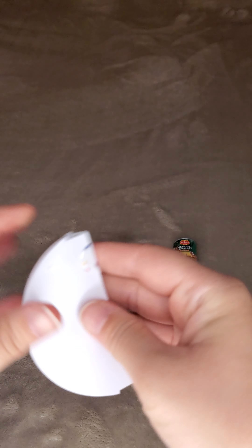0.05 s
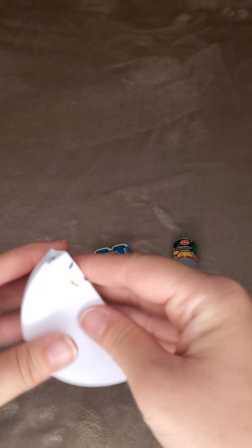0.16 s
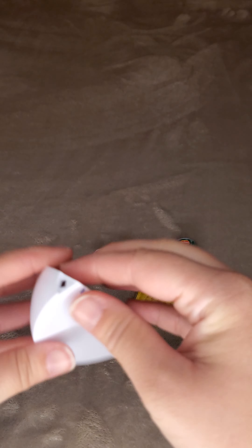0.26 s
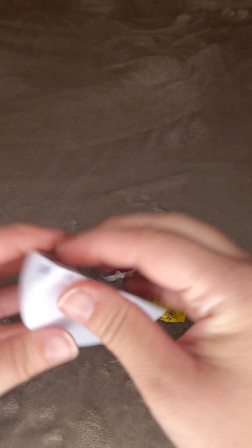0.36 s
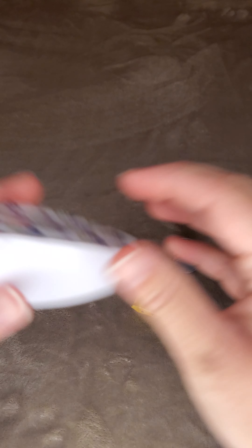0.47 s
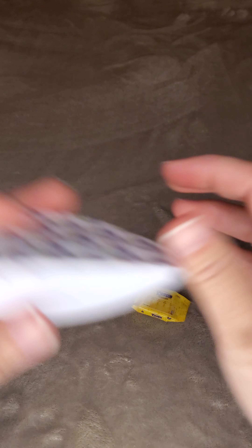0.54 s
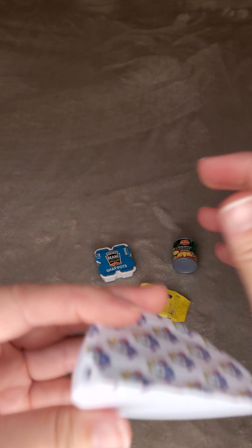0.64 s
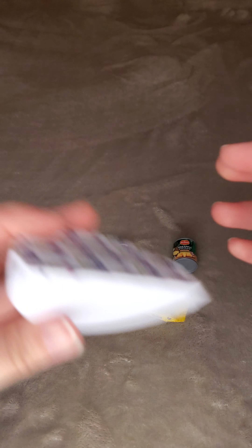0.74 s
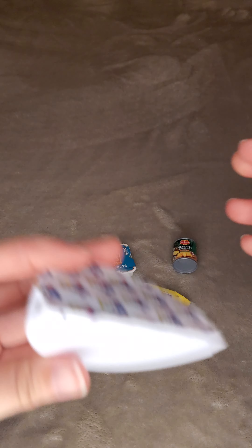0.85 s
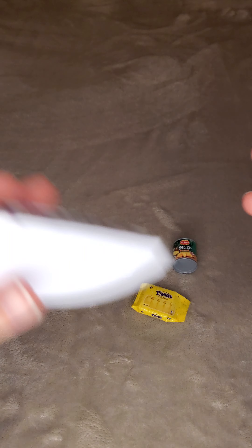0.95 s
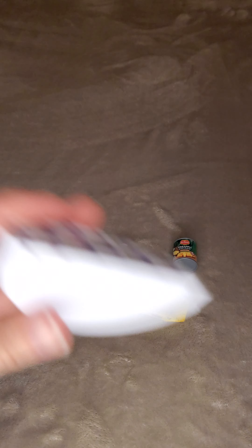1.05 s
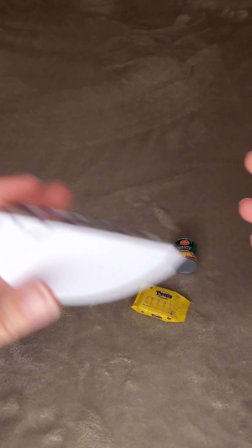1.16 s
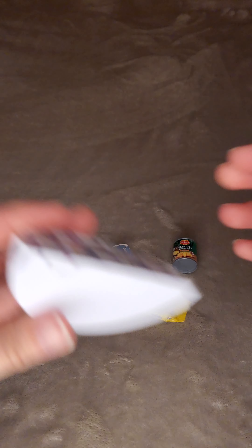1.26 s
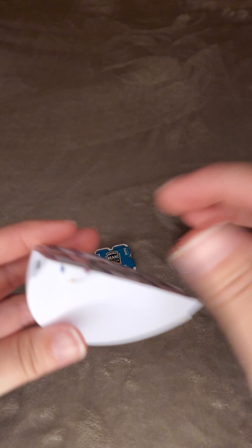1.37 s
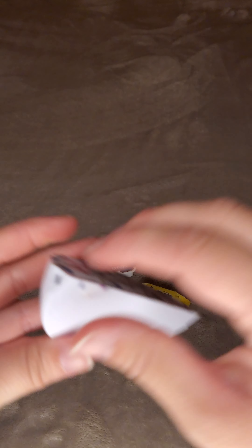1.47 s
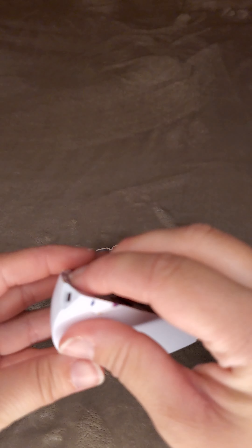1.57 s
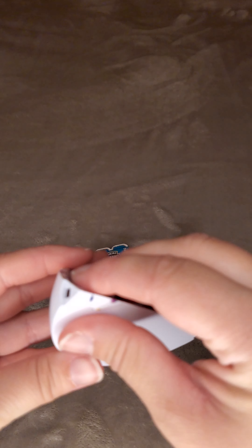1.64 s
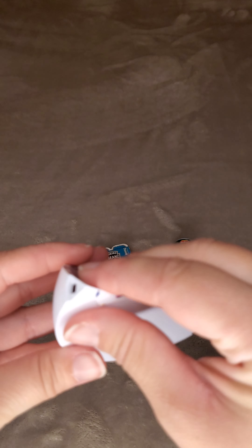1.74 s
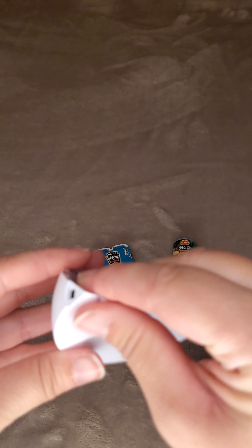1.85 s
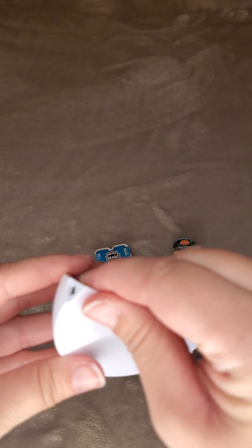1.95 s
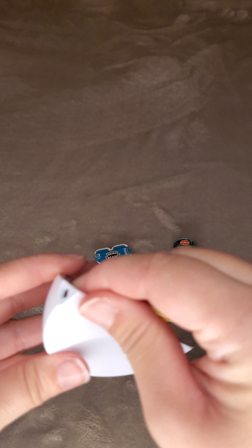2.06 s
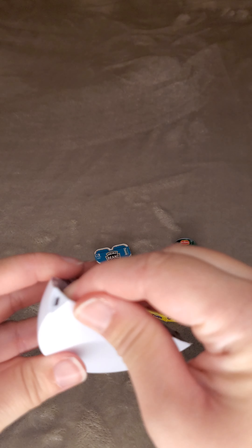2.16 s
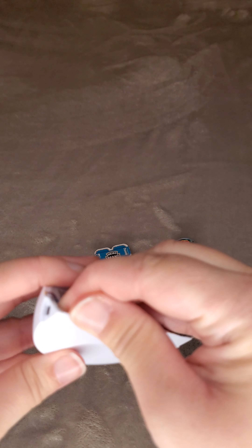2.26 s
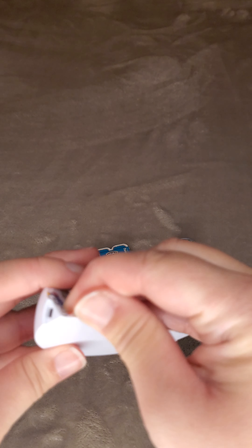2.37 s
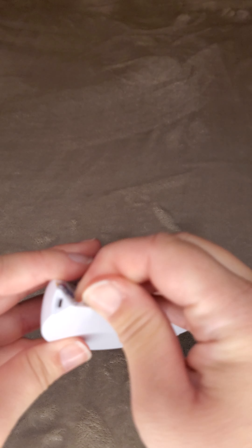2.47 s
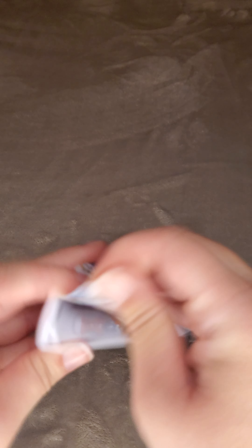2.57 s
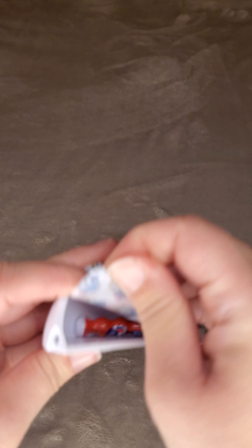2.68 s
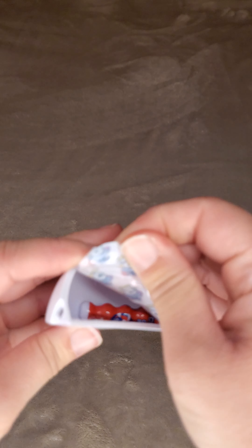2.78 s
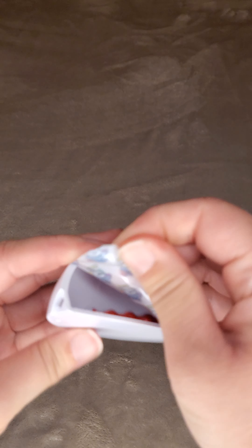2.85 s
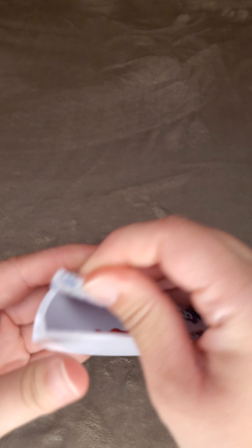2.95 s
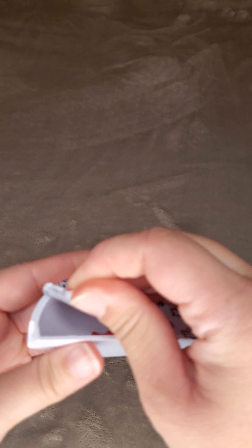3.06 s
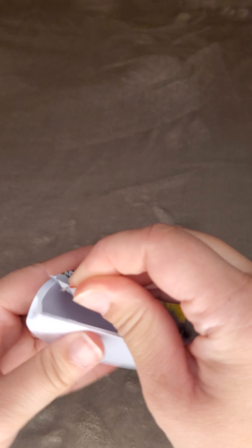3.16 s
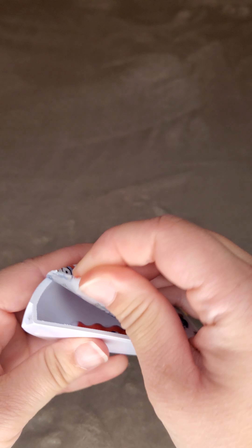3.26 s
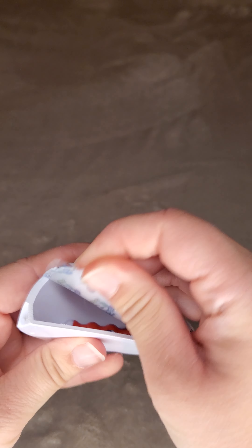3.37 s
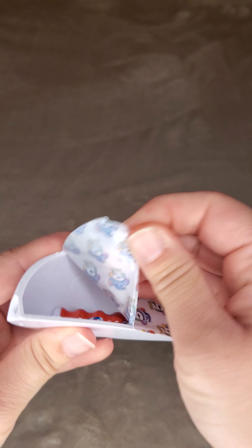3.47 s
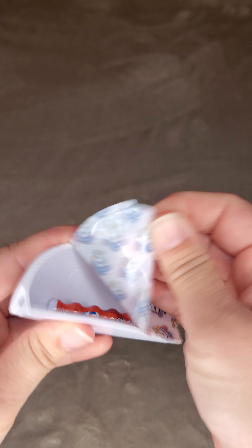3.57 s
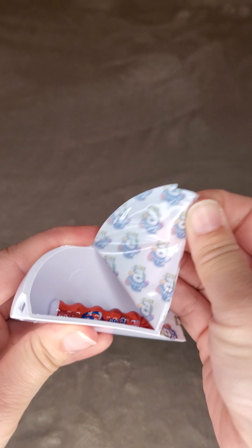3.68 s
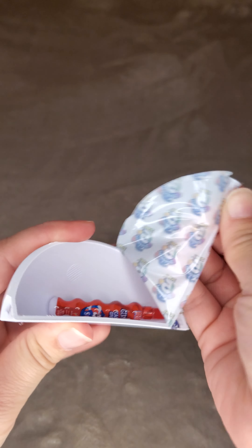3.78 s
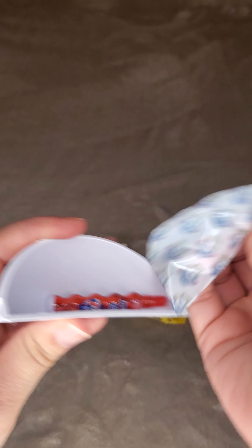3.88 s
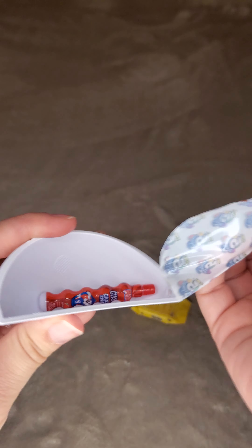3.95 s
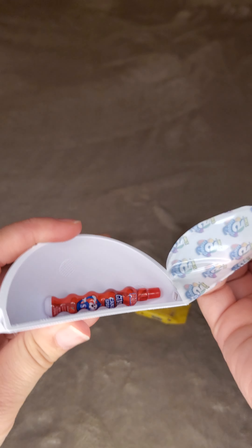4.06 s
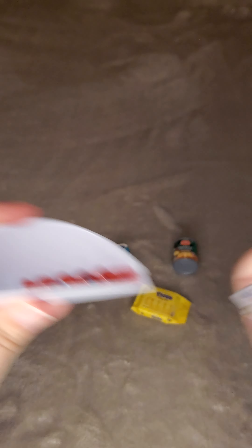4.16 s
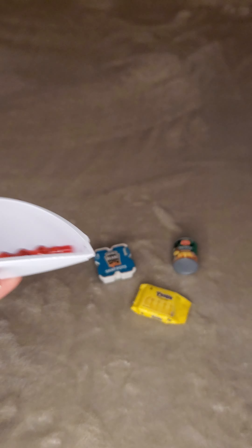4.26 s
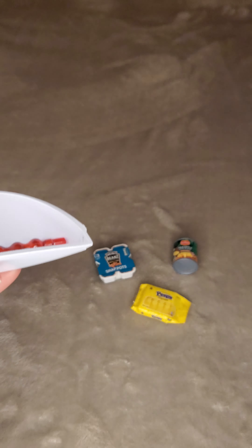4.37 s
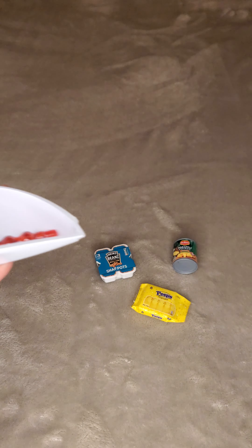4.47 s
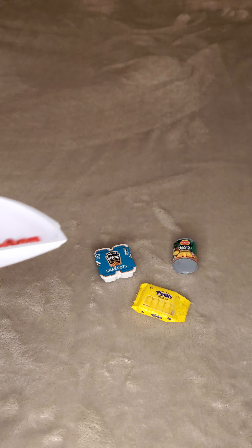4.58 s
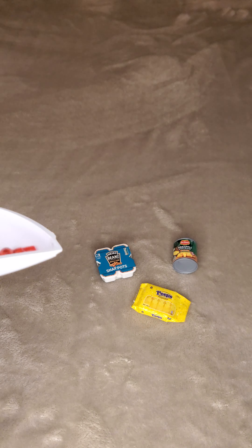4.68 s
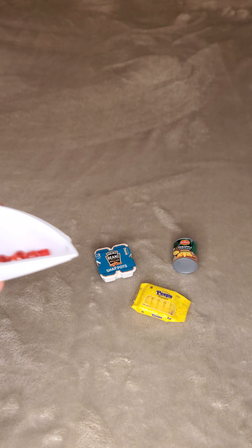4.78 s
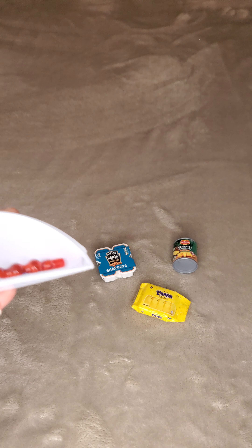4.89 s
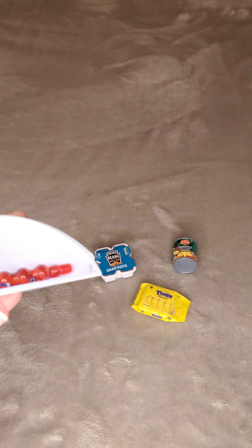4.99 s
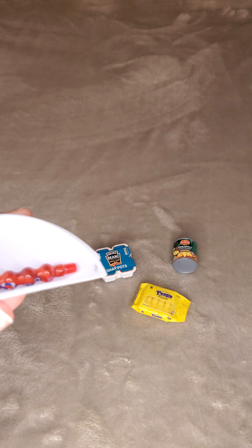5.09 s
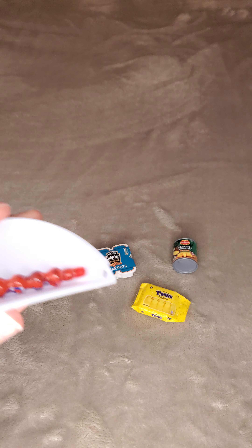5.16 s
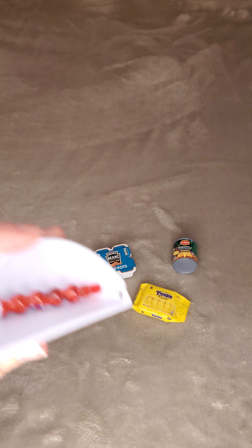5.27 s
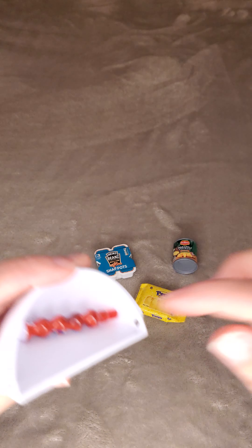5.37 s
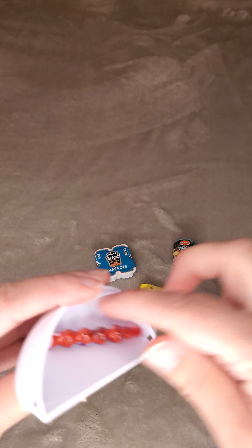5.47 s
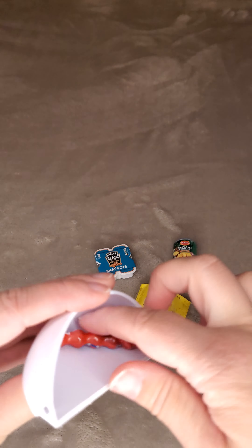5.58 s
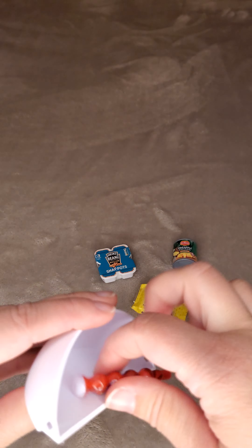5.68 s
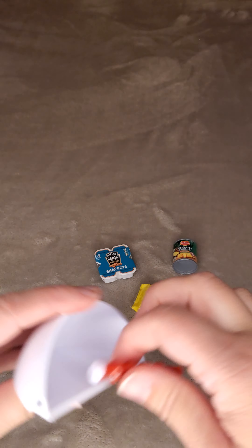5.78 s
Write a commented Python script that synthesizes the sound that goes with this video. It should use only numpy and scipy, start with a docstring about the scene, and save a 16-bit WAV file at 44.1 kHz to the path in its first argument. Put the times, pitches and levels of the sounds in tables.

```python
"""Peeling a small plastic shell

Close on a two-port microphone, hands shake a thin hollow plastic wedge with a toy inside, then peel off its film lid.
Each knock or snap is a ragged push that rings wall, air hollow, film and flexing shell.
Rubbing and tearing drive the same modes with dense grains; pulled film and shell drum low.
Air thuds on the ports, film and sleeve rustle away over a blanket, the room answers briefly above a quiet hiss."""
import sys
import numpy as np
from scipy import signal
from scipy.fft import rfft, irfft
from scipy.io import wavfile
from scipy.ndimage import uniform_filter1d

SR = 44100
rng = np.random.default_rng(int(sys.argv[2]) if len(sys.argv) > 2 else 0)


def master_out(mix):
    """Clip the mix to full scale and print it as 16-bit PCM to the path in sys.argv[1]."""
    frames = np.transpose(np.atleast_2d(mix))
    ceiling = np.clip(frames, -1, 1)
    pcm = np.round(ceiling * 32767).astype(np.int16)
    wavfile.write(sys.argv[1], SR, pcm)


N = 257099
OPEN_FROM_S = 5.45   # from here on the shell is lidless

# knocks and snaps: [t/s, wall level/dB, hollow level/dB, film level/dB, strongest wall ring f/Hz, contact/ms]
SNAPS = [(.097, -39.5, -34.5, -42.5, 3142, 2.8), (.207, -61.5, -52, -80, 2130, 1.5),
         (.277, -69, -55.5, -66, 2110, 2), (.318, -52, -48, -47, 3753, 4.6),
         (.4, -73, -51, -69, 1970, 0.87), (.419, -76, -54, -74, 1944, 1.7),
         (.56, -42, -37.5, -54, 3406, 0.79), (.587, -45, -38, -61, 3325, 0.55),
         (.645, -17.5, -22, -23, 3303, 0.46), (.655, -28, -25.5, -48.5, 3530, 0.32),
         (.699, -10, -25.5, -26, 3442, 0.9), (.716, -29.5, -36, -54, 3726, 0.94),
         (.724, -13.5, -10, -15.5, 3880, 1.73), (.742, -15.5, -22, -42, 3900, 1.44),
         (.767, -14, -18.5, -14, 3560, 3.02), (.954, -33.5, -28.5, -62.5, 3048, 0.77),
         (.963, -19, -30, -17.5, 3684, 0.63), (.977, -23.5, -35, -27, 4410, 2.6),
         (.983, -19, -29, -17.5, 4443, 0.94), (.989, -18.5, -30, -32.5, 3720, 0.55),
         (1.045, -34.5, -37, -41, 3573, 0.53), (1.14, -14, -27, -18.5, 3502, 1.12),
         (1.17, -26, -47, -59, 3466, 3.6), (1.176, -26, -21, -24.5, 4395, 3),
         (1.213, -28.5, -23, -24.5, 3380, 2.7), (1.392, -47, -34.5, -75, 1952, 0.35),
         (1.406, -19.5, -25, -19, 3818, 0.93), (1.432, -19.5, -24.5, -21.5, 4527, 2.4),
         (1.445, -15, -21, -20, 3650, 1.06), (1.467, -31.5, -28.5, -40.5, 2290, 0.48),
         (1.61, -23.5, -30.5, -26, 2482, 0.14), (1.621, -38, -63.5, -42.5, 2450, 1.86),
         (1.631, -32.5, -33, -35.5, 4540, 1.2), (1.647, -42.5, -45, -64.5, 2610, 3.6),
         (1.687, -58, -50.5, -76, 2910, 2.2), (1.881, -53, -51.5, -36, 2060, 1.14),
         (1.895, -75, -47.5, -65, 1900, 1.08), (1.979, -72, -64, -51.5, 4370, .5),
         (2.007, -65, -53, -49, 1950, 0.91), (2.035, -47.5, -39.5, -47, 2871, 1.27),
         (2.083, -51.5, -45, -50, 3060, 2.5), (2.109, -70, -31.5, -89, 2519, 1.03),
         (2.131, -61.5, -46.5, -82, 3005, 0.78), (2.203, -41.5, -51.5, -36, 4370, 0.49),
         (2.245, -56, -62, -43, 4940, .8), (2.25, -39, -48.5, -27.5, 4890, 2.04),
         (2.291, -55.5, -53, -49.5, 5120, 1.6), (2.363, -51.5, -65, -46.5, 5273, 4.7),
         (2.385, -50, -70, -47, 5050, 0.39), (2.407, -54, -53, -53, 4500, 1.5),
         (2.412, -36, -24.5, -64, 1843, 1.47), (2.467, -47.5, -58, -42, 5130, 0.37),
         (2.497, -55, -54, -53, 2877, 0.57), (2.528, -48, -66, -36.5, 4900, 0.097),
         (2.645, -37, -65, -33, 5150, 0.5), (2.661, -17, -29, -14.5, 3198, 4),
         (2.693, -32.5, -63.5, -59, 2642, 0.38), (2.706, -28, -22, -28, 1970, 0.9),
         (2.716, -27, -26, -31, 2304, 4.9), (2.723, -33.5, -43, -51.5, 1955, 1.4),
         (2.737, -28, -27.5, -30.5, 3840, 2), (2.767, -34, -23, -42, 2462, 2.2),
         (2.882, -42, -33.5, -44, 3350, 1.25), (2.93, -34, -33, -36, 2578, 1.6),
         (2.944, -43.5, -41, -71, 2550, 0.44), (2.971, -37, -48, -54, 1770, 1.7),
         (3.007, -39, -44, -41, 2529, 0.32), (3.041, -40.5, -42, -54, 1917, 0.16),
         (3.106, -29.5, -45, -43, 3018, 0.09), (3.188, -74, -49, -78, 2130, 0.8),
         (3.207, -35, -40, -60, 3530, 2), (3.216, -35, -36.5, -50, 3460, 0.77),
         (3.221, -43, -32.5, -60, 3666, 2.45), (3.226, -26.5, -35, -37.5, 3487, 2.5),
         (3.246, -37, -41, -57, 3610, 0.54), (3.307, -31, -35, -39, 2562, 0.2),
         (3.322, -44.5, -37, -44, 3540, 2.6), (3.396, -50, -46.5, -52.5, 2210, 0.34),
         (3.414, -43.5, -44, -50.5, 2190, 0.44), (3.437, -16.5, -21, -22.5, 2462, 2.66),
         (3.459, -34, -34, -26.5, 2410, 0.45), (3.478, -31.5, -28.5, -33, 2206, 4.1),
         (3.492, -30.5, -36, -19.5, 2400, 0.11), (3.5, -27.5, -30, -31, 2237, 0.42),
         (3.539, -26, -29.5, -23.5, 2097, 1.86), (3.55, -40.5, -51, -33.5, 2253, 0.86),
         (3.589, -18.5, -25.5, -20, 3577, 0.51), (3.642, -29, -66, -52, 2288, 2.5),
         (3.657, -21, -45, -20.5, 1870, 2), (3.717, -26.5, -33, -25, 2300, 0.42),
         (3.739, -38, -39, -37, 3500, 0.6), (3.771, -36, -42, -59.5, 2228, 1.2),
         (3.781, -22.5, -25.5, -17.5, 2160, 0.93), (3.787, -21, -44, -35, 2274, 0.85),
         (3.799, -17.5, -18.5, -19, 4027, 0.51), (3.824, -19, -28, -14.5, 3800, 0.29),
         (3.835, -30, -25.5, -24.5, 2100, 0.53), (3.888, -28.5, -38, -28, 4094, 1.7),
         (3.895, -21, -42, -20, 4150, 1.34), (3.931, -18, -46, -23.5, 3437, 0.28),
         (3.957, -23, -33, -26.5, 2292, 0.35), (4.032, -24, -26.5, -19, 4446, 4.8),
         (4.052, -31.5, -39, -31.5, 3820, 2.1), (4.118, -31, -40, -30, 3366, 0.42),
         (4.167, -25.5, -29, -19.5, 2655, 0.8), (4.181, -27.5, -28.5, -51, 2813, 0.22),
         (4.186, -34, -28.5, -22, 3500, 0.49), (4.192, -28.5, -37, -19, 2322, 0.47),
         (4.207, -32, -28.5, -21.5, 2330, 4.6), (4.235, -26, -39.5, -26, 2990, 1.4),
         (4.272, -32, -53, -54, 2326, 0.66), (4.279, -22, -38, -26, 2250, 1.93),
         (4.29, -34.5, -51, -43, 2378, 5.9), (4.332, -37.5, -55, -49, 2430, 0.89),
         (4.399, -54, -82, -46, 4303, 0.18), (4.471, -53.5, -89, -47, 3450, 0.3),
         (4.511, -45, -84, -37.5, 4755, 4.4), (4.956, -62.5, -71, -43, 4890, 1),
         (5.573, -43, -54.5, -69, 2246, 1.67), (5.597, -44, -56, -55, 2850, 1.5),
         (5.614, -35, -42, -50, 3844, 2.8), (5.686, -48, -74, -66, 4077, 2.3),
         (5.706, -28.5, -52, -51, 3180, 0.57), (5.718, -30, -48, -44, 3100, 3.7),
         (5.744, -45, -38, -56, 2234, 0.23), (5.755, -29.5, -49, -44.5, 2018, 0.97),
         (5.765, -33.5, -52, -49, 2030, 1.6)]
# shell wall modes: [f/Hz, relative level/dB, t60/s]
WALL = [(1910, -11.5, 0.0066), (2210, -10.5, 0.012), (2716, -4, 0.0089), (3176, -4, 0.0066),
        (3820, 1.5, 0.0024), (4330, -14, 0.013), (5290, -15.5, 0.0099)]
# film and rim modes: [f/Hz, relative level/dB, t60/s]
FILM = [(5780, 4.5, 0.0021), (6710, -5.5, 0.0077), (7445, 0, 0.0059), (8110, 0.5, 0.0071),
        (8550, -5.5, 0.0055), (10420, -7.5, 0.0022), (12600, -8, 0.0015), (15000, -9.5, 0.0022)]
# flexing of the whole shell, the last mode sounding along with the hollow: [f/Hz, relative level/dB, t60/s]
FLEX = [(217, -23.5, 0.027), (314, -31, 0.065), (390, -17, 0.031), (675, -28, 0.0032), (1021, -7.5, 0.0097)]
# the air hollow as hands and lid cover it: [t/s, pitch f/Hz, t60/s]
HOLLOW = [(0, 1394, 0.027), (.72, 1309, 0.016), (1.699, 1434, 0.025), (1.9, 1210, 0.013),
          (2.04, 1397, 0.027), (2.11, 1224, 0.029), (2.42, 1270, 0.021), (2.7, 1414, 0.034),
          (2.88, 1433, 0.024), (2.93, 1249, 0.0081), (3.19, 1344, 0.011), (3.22, 1483, 0.04),
          (3.3, 1448, 0.018), (3.44, 1256, 0.023), (3.6, 1569, 0.014), (3.799, 1276, 0.0017),
          (4.3, 1413, 0.01), (5.6, 1758, 0.0065)]
# share of sound that differs in the right port: [wall, hollow, film, flexing]
UNLIKE = (0.9, 0.57, 0.99, 0.94)


def snaps():
    """Each contact is a short ragged push; every mode answers with a strength of its own."""
    hollow_spread = 0.052   # share by which each knock strays from the hollow's pitch
    # small after-clicks of wall and film that trail each snap
    crackle_db, crackle_per_s, crackle_decay_s = -17, 300, .008
    size = 2000   # samples per snap
    out, t = np.zeros((2, N + size)), np.arange(size) / SR
    rough = rng.standard_normal((len(SNAPS), 2, size))
    luck_db = 4.5 * rng.standard_normal((len(SNAPS), 2, 4, 10))
    after = rng.random((len(SNAPS), size)) < crackle_per_s / SR
    topmost = np.arange(10) >= 5   # upper film modes
    knots, pitch_hz, rings_s = np.transpose(HOLLOW)
    stray = np.exp(hollow_spread * rng.standard_normal(len(SNAPS)))
    hollows_hz = np.interp(np.array(SNAPS)[:, 0], knots, pitch_hz) * stray
    for k, (s, wall_db, hollow_db, film_db, ring_hz, contact_ms) in enumerate(SNAPS):
        # the push swells, then ends quickly
        envelope = t * np.exp(-(1000 * t / np.clip(contact_ms, .1, 15)) ** 2)
        push = rough[k] * np.abs(rough[k]) ** .5 * envelope
        clicks = amp(crackle_db) * rough[k, :, ::-1] * after[k] * np.exp(-t / crackle_decay_s)
        crackling = push / np.abs(push).max() + clicks
        # air and the whole shell feel no sharp edges
        dull = signal.lfilter([1], [1, -.7], push)
        # a snap of the film alone is crisper than a knock on the wall
        crisp_db = 1.5 * np.clip(film_db - wall_db, -12, 12) * topmost
        wall = WALL + [(ring_hz, 3, .011)]
        hollow = FLEX[-1:] + [(hollows_hz[k], 3.0, np.interp(s, knots, rings_s))]
        # part: push, modes, level/dB, tilt/dB
        parts = [(crackling, wall, wall_db, 0), (dull, hollow, hollow_db, 0),
                 (crackling, FILM, film_db, crisp_db), (dull, FLEX[:-1], hollow_db - 27.5, 0)]
        at = round(s * SR)
        for p, (drive, modes, db, tilt_db) in enumerate(parts):
            both = np.array([body(drive[side], modes, luck_db[k, side, p] + tilt_db) for side in (0, 1)])
            # rms of the loudest 2 ms
            loudest = np.sqrt(uniform_filter1d(both ** 2, size=88).max(axis=1))
            out[:, at:at + size] += amp(db) * pair(*(both / loudest[:, None]), UNLIKE[p])
    return out[:, :N]


def rubbing():
    """Skin and tearing glue: smooth friction plus clumps of tiny uneven slips, through the shell's modes."""
    # the lidless shell under a scraping finger: [f/Hz, relative level/dB, t60/s]
    open_shell = [(1950, -12, .014), (2260, -6, .045), (2950, -9, .018), (3950, -9, .025), (5800, -9, .028)]
    peel_from_s, tear_from_s = 1.8, 3.4
    # harder rubbing than this film level turns gritty and bright; lighter skin contact is smooth and dull
    bite_from_db, skin_cut_hz = -52.5, 9400
    gains, t = pressure(), np.arange(N) / SR
    bite = np.clip((20 * np.log10(gains[2]) - bite_from_db) / 12, 0, 1)
    tearing = (t > tear_from_s) & (t < OPEN_FROM_S)

    # slowly torn glue lets go in separate ticks
    dense = np.where(tearing, np.maximum(bite, .07), 1)
    slip_per_s = 2600 * dense * amp(5.0 * drift(50))
    slips = (rng.random((2, N)) < slip_per_s / SR) / np.sqrt(dense)
    uneven = amp(4.55 * np.minimum(rng.exponential(1, (2, N)), 5))
    slips = slips * uneven * rng.choice([-1, 1], (2, N))
    smooth = rng.standard_normal((2, N)) * amp(3 * drift(90))
    grit = np.where(tearing, .9, .65 + .3 * bite)   # share of slips in the friction
    sharp = grit * rms_one(slips) + np.sqrt(1 - grit ** 2) * smooth

    skin = signal.butter(4, skin_cut_hz, fs=SR, output="sos")
    soft = rms_one(signal.sosfilt(skin, signal.lfilter([1], [1, -.6], sharp)))
    # nail and glue are always sharp
    peeling = (t > peel_from_s) & (t < OPEN_FROM_S)
    edge = np.where(peeling, 1, np.maximum(bite, .1))
    friction = edge * sharp + (1 - .8 * edge) * soft
    elsewhere = np.roll(friction, 300, axis=1)

    def rubbed(modes):
        """Neighbouring modes are driven from different spots under the finger."""
        here = body(friction, modes[::2], 3.5 * grip(len(modes)))
        there = body(elsewhere, modes[1::2], 3.5 * grip(len(modes)))
        return rms_one(here + there)

    # the wall mode that the latest knock favoured also stands out under the finger
    knocks = np.array(SNAPS)
    latest = np.clip(np.searchsorted(knocks[:, 0], t) - 1, 0, None)
    favoured = wandering(soft, knocks[latest, 4], .018)
    lidded = rms_one(rubbed(WALL) + amp(-3.5) * favoured)
    wall = np.where(t < OPEN_FROM_S, lidded, rubbed(open_shell))
    # the hollow rings at the pitch that the hands leave it, a wall mode beside it
    air = wandering(soft, in_time(HOLLOW)[0] * np.exp(.04 * drift(20)), .018)
    hollow = rms_one(air + amp(-7.0) * rubbed(FLEX[-1:] + [(1570, -9.5, 0.024)]))
    parts = (wall, hollow, rubbed(FILM), rubbed(FLEX[:-1]))
    return sum(gain * pair(*part, unlike) for gain, part, unlike in zip(gains, parts, UNLIKE))


def pressure():
    """Each stroke swells, holds and fades at one common rate: gains of wall, hollow, film and flexing."""
    # strokes of rubbing and tearing:
    # [peak t/s, swell/ms, hold/ms, wall level/dB, hollow level/dB, film level/dB, low flexing level/dB]
    strokes = [(0, 25, 96, -69, -48.5, -89, -78), (.315, 74, 29, -83, -57.5, -73, -83),
               (.41, 32, 56, -88, -73, -77, -80), (0.554, 21, 32, -76, -46.5, -66, -66.5),
               (0.645, 59, 2.2, -41.5, -34, -36, -47), (0.729, 24, 2.8, -47, -34, -41.5, -49.5),
               (0.774, 77, 1, -28.5, -27.5, -34, -49), (.87, 63, 45, -52.5, -43.5, -60, -64.5),
               (.99, 59, 3, -28.5, -27.5, -32, -44.5), (1.06, 63, 43, -44.5, -38, -46.5, -53.5),
               (1.181, 70, 6.2, -33, -41, -41, -46), (1.217, 140, 1.5, -46, -35.5, -51, -44),
               (1.315, 40, 38, -51.5, -43.5, -61, -63.5), (1.444, 50, 2.6, -36.5, -30, -38.5, -41.5),
               (1.624, 33, 3.7, -46, -40, -67, -59), (1.892, 22, 29, -76, -64, -83, -68.5),
               (2.04, 53, 19, -81, -66, -86, -65), (2.121, 49, 25, -73, -65, -91, -64.5),
               (2.259, 87, 47, -70, -70.5, -66, -79), (2.422, 34, 35, -67, -56.5, -84, -78.5),
               (2.668, 20.4, 1.6, -24.5, -29, -27.5, -42.5), (2.7, 30, 74, -46.5, -40.5, -59.5, -67.5),
               (2.985, 360, 24, -62, -58, -72, -76.5), (3.05, 100, 140, -68.5, -65, -81, -79),
               (3.214, 14.6, 45, -49, -42, -57.5, -62.5), (3.29, 120, 48, -63, -57, -69.5, -68),
               (3.452, 14, 10, -33, -36.5, -42, -57), (3.548, 49, 1.8, -40.5, -46, -46, -53),
               (3.595, 18, 35, -47, -47.5, -44.5, -55), (3.665, 15, 28.5, -35.5, -40.5, -36.5, -47.5),
               (3.795, 32, 6.2, -29, -30.5, -31.5, -41.5), (3.9, 32, 100, -37.5, -47.5, -45.5, -57),
               (3.996, 36, 9.3, -24.5, -29, -31, -49), (4.05, 26, 2.5, -34, -40, -37.5, -46),
               (4.184, 8.2, 24.3, -27, -56, -27.5, -39), (4.235, 59, 78, -43.5, -55, -57, -57.5),
               (4.349, 60, 45, -56, -79, -61.5, -69.5), (4.522, 92, 33, -62.5, -105, -61, -73),
               (5.55, 57, 22, -59, -74, -63, -78), (5.6, 94, 11, -45, -61.5, -72, -71),
               (5.706, 29, 31, -44, -49, -57, -73.5), (5.79, 40, 40, -71, -76.5, -82, -83)]
    # fingers merely holding on: [wall level/dB, hollow level/dB, film level/dB, flexing level/dB]
    resting_db = (-93, -100, -79, -104)
    # a bend above 1 starts a stroke steeply and rounds off its top
    swell_db, swell_bend, fade_db_per_s = 30, 0.99, 480
    t = np.arange(N) / SR
    power = amp(resting_db)[:, None] ** 2 * np.ones(N)
    for s, swell_ms, hold_ms, *db in strokes:
        near = around(s, .4)
        early = np.clip(1000 * (s - t[near]), 0, None) / max(swell_ms, 1)
        late = np.clip(t[near] - s - max(hold_ms, 0) / 1000, 0, None)
        shape = amp(-swell_db * early ** swell_bend - fade_db_per_s * late)
        power[:, near] += np.outer(amp(db), shape) ** 2
    return np.sqrt(power)


def grip(count):
    """The hold on the shell shifts about every 70 ms: one wandering number for each mode."""
    knots = np.arange(0, N + 3000, 3000)
    holds = rng.standard_normal((count, len(knots)))
    return np.array([np.interp(np.arange(N), knots, row) for row in holds])


def drumming():
    """The taut film and shell drum low when pulled: each ragged pull rings one low mode."""
    # pulls: [t/s, pitch f/Hz, level/dB, length/ms]
    pulls = [(0.771, 334, -41.5, 8.6), (2.411, 360, -53.5, 10), (2.659, 326, -45.5, 12),
             (2.659, 834, -32, 17.4), (3.221, 233, -55.5, 51), (3.654, 473, -42.5, 14)]
    drum_cycles = 9.0   # cycles to die by 60 dB in the first resonance
    out, size = np.zeros(N), 8000
    rough = rng.standard_normal((len(pulls), size))
    for row, (s, hz, db, length_ms) in zip(rough, pulls):
        length = length_ms * SR / 1000   # samples
        pull = row * np.exp(-(np.arange(size) / length) ** 2)
        rung = ring(pull, hz, drum_cycles / hz)
        rung = ring(rung, hz, 2.7 / hz)   # steep skirts
        at = round(s * SR)
        out[at:at + size] += amp(db) * rung / np.sqrt(np.sum(rung ** 2) / (length + SR / hz))
    return out


def ports(x):
    """The right port lies farther off: later and shaded by the housing; little of the body's sound reaches
    below about 170 Hz."""
    # the capsule as the ports hear it: [f/Hz, left minus right level/dB]
    lean = [(60, -17), (130, -4.5), (290, -1), (640, 5), (1410, 7), (3100, 9), (6820, 10), (15000, -8)]
    port_lag_s = 0.00015
    open_left_db = 1   # the open shell is held farther left
    left, right = signal.sosfilt(signal.butter(2, 170, "high", fs=SR, output="sos"), x)
    right = np.interp(np.arange(N) - port_lag_s * SR, np.arange(N), right)
    aside = amp(open_left_db / 2 * (np.arange(N) > OPEN_FROM_S * SR))
    left, right = left * aside, right / aside
    half = np.array(lean) * [1, .5]
    return np.array([coloured(left, half), coloured(right, half * [1, -1])])


def puffs():
    """Each puff of air is a swell of low pressure, a few uneven cycles long, mostly on the left port."""
    # puffs on the ports: [t/s, level/dB before a common lift of 3.5 dB]
    gusts = [(0.593, -56), (0.649, -50), (0.715, -60), (0.775, -67), (1.028, -67), (1.176, -67),
             (1.218, -63), (2.675, -53), (3.677, -60),  (3.956, -62.5), (4.047, -48.5), (4.229, -48),
             (4.601, -56), (4.626, -46.5), (4.651, -43), (4.729, -55.5), (5.48, -70)]
    out, t = np.zeros((2, N)), np.arange(N) / SR
    lumps = amp(2.5 * drift(40))   # turbulence roughens the swell
    chance = rng.standard_normal((len(gusts), 3))
    for (s, db), (pitch, phase, lean) in zip(gusts, chance):
        near = around(s, .1)
        late = t[near] - s
        turn = 2 * np.pi * 58 * np.exp(.15 * pitch) * late + 3 * phase
        left = np.sin(turn) + 0.5 * np.sin(1.8 * turn)
        right = amp(-8.0 + 1.5 * lean) * np.sin(turn - .8)
        swell = np.exp(-(late / 0.021) ** 2)
        out[:, near] += amp(db + 3.5) * swell * np.array([left, right]) * lumps[near]
    return out


def rustle():
    """Soft bright friction noise, slightly patchy, own in each port."""
    # film and sleeve sliding away over the blanket: [t/s, middle level/dB]
    sliding = [(4.2, -99), (4.4, -66.5), (4.77, -62.5), (4.9, -67), (5.08, -78), (5.12, -61), (5.19, -77),
               (5.4, -69), (5.7, -71)]
    left_db = 2.5   # left minus right
    tone = [(1800, -21.5), (3500, -6.5), (7500, -4.5), (10000, -10.5), (16000, -7.5)]   # f/Hz, gain/dB
    bright = rms_one(coloured(rng.standard_normal((2, N)), tone))
    sides_db = left_db * np.array([[.5], [-.5]])
    return amp(in_time(sliding)[0] + 2.1 * drift(60) + sides_db) * bright


def room(x):
    """A short soft tail from furnishings nearby: decaying noise, own in each port."""
    t60_s, tail_db = .1, -24
    t = np.arange(SR // 4) / SR
    tail = rng.standard_normal((2, len(t))) * amp(-60 * t / t60_s) * (t > .003)
    tail = tail / np.sqrt(np.sum(tail ** 2, axis=1, keepdims=True))
    return amp(tail_db) * signal.fftconvolve(x.mean(axis=0)[None], tail, axes=1)[:, :N]


def hiss():
    """Steady microphone and room noise, unrelated in the two ports."""
    # noise colour: [f/Hz, relative level/dB]
    colour = [(20, -21.5), (45, -5), (110, -8), (320, -16), (650, -26), (1400, -24), (6500, -27),
              (7800, -21), (8150, -17), (8500, -23), (9200, -25.5), (17000, -26.5)]
    hiss_db = -75.5   # rms
    return amp(hiss_db) * rms_one(coloured(rng.standard_normal((2, N)), colour))


def amp(db):
    """Decibels to amplitude."""
    return 10 ** (np.asarray(db) / 20)


def rms_one(x):
    """Scale to an rms of 1."""
    return x / np.sqrt(np.mean(x ** 2) + 1e-20)


def in_time(rows):
    """Columns of a curve at every sample."""
    s, *columns = np.transpose(rows)
    return [np.interp(np.arange(N) / SR, s, c) for c in columns]


def around(s, reach_s):
    """Samples within reach of a moment."""
    return slice(max(round((s - reach_s) * SR), 0), round((s + reach_s) * SR))


def drift(rate):
    """Slow chance of spread 1: noise through a low-pass at the given rate in Hz."""
    r = np.exp(-2 * np.pi * rate / SR)
    slow = signal.lfilter([1], [1, -2 * r, r * r], rng.standard_normal(N + SR))
    return rms_one(slow[SR:])


def ring(push, hz, t60):
    """A unit click sets a sine of height 1 ringing; a steady push moves no air."""
    r, w = amp(-60 / (t60 * SR)), 2 * np.pi * hz / SR
    return signal.lfilter(np.cos(w / 2) * np.array([1, -1]), [1, -2 * r * np.cos(w), r * r], push + 1e-18)


def body(push, modes, luck_db):
    """All modes of one part, neighbours in opposite phase."""
    return sum((-1) ** k * amp(db + luck_db[k]) * ring(push, hz, t60)
               for k, (hz, db, t60) in enumerate(modes))


def wandering(push, hz, t60):
    """A resonance whose pitch moves from sample to sample."""
    turn, r = np.exp(2j * np.pi * np.cumsum(hz) / SR), amp(-60 / (t60 * SR))
    rung = signal.lfilter([1], [1, -r], push / turn) * turn
    return rms_one(np.diff(rung.real, prepend=0))


def coloured(x, points):
    """Gain in dB against log frequency."""
    hz, table = np.fft.rfftfreq(N, 1 / SR), np.array(points)
    gain_db = np.interp(np.log(hz + 1), np.log(table[:, 0] + 1), table[:, 1])
    return irfft(rfft(x) * amp(gain_db), N)


def pair(near, far, unlike):
    """Left and right from two versions of a sound."""
    unlike = np.clip(unlike, 0, 1)
    return np.array([near, np.sqrt(1 - unlike ** 2) * near + unlike * far])


def scene():
    """Capsule in its room as the ports hear it, rustle, air on the ports, hiss."""
    capsule = snaps() + rubbing() + drumming()
    return ports(capsule + room(capsule)) + rustle() + puffs() + hiss()


def record(dry):
    """The highest peaks are rounded, the top is cut steeply."""
    cutoff_hz = 17100   # 90 dB down from here up
    rounded = .84 * np.tanh(dry / .84)
    return signal.sosfilt(signal.cheby2(16, 90, cutoff_hz, fs=SR, output="sos"), rounded)


dry = scene()
out = record(dry)
master_out(out)
```